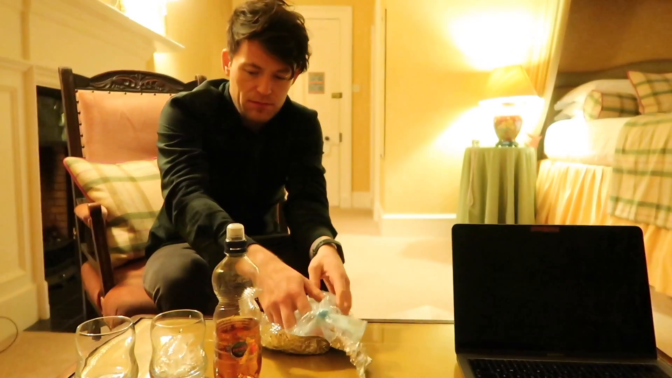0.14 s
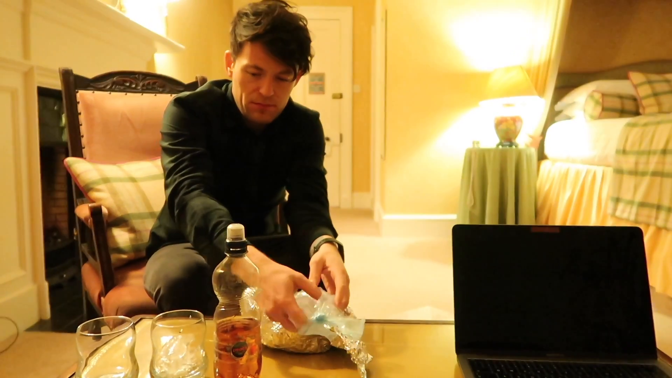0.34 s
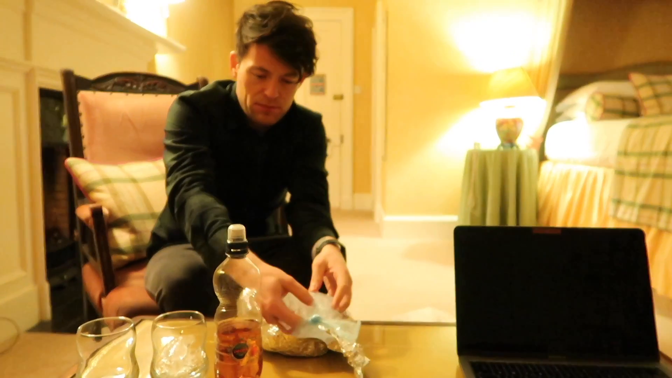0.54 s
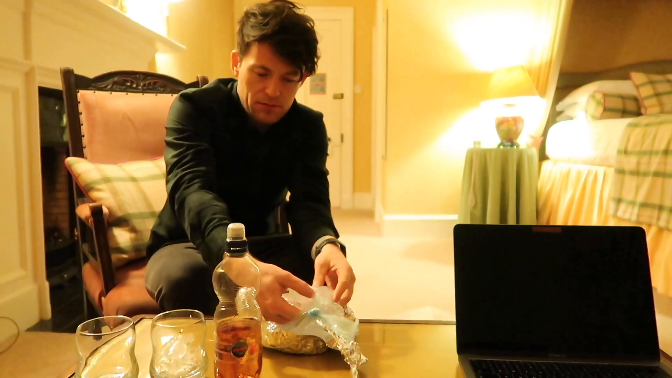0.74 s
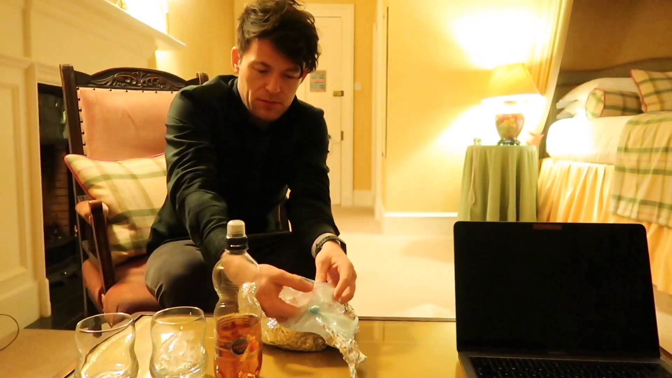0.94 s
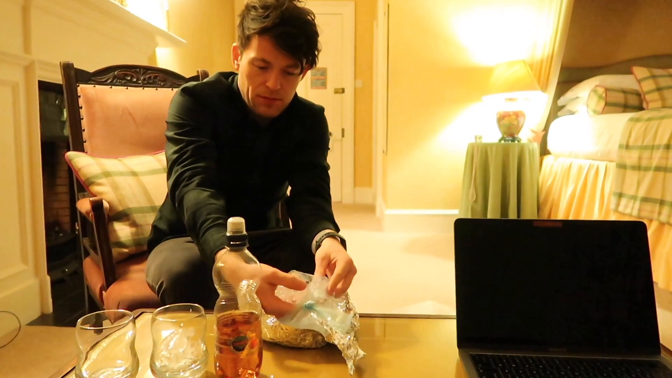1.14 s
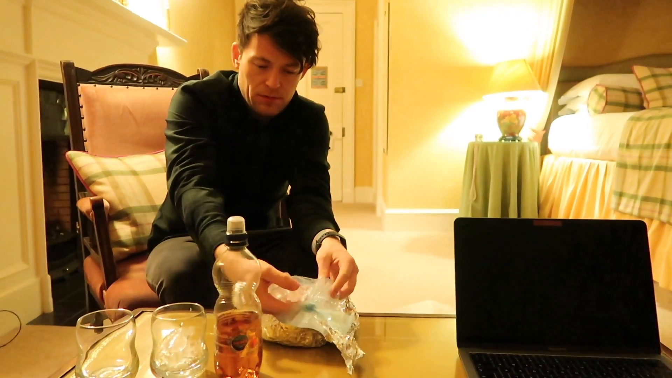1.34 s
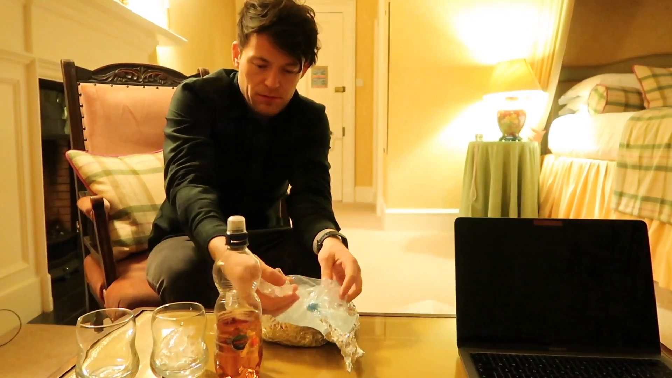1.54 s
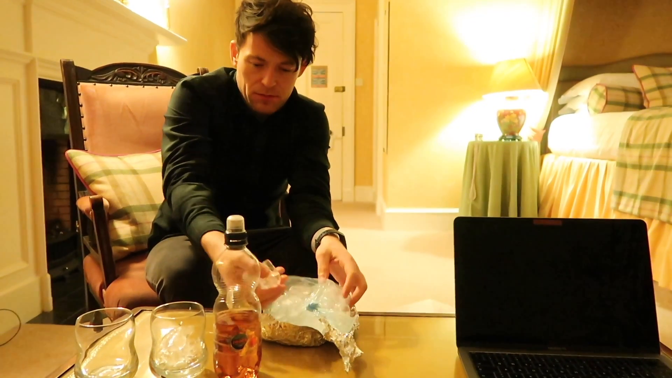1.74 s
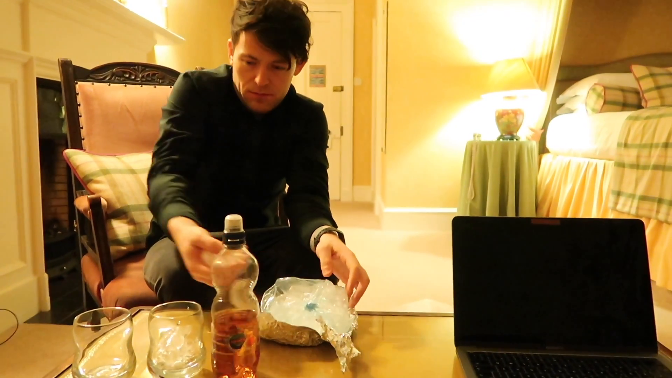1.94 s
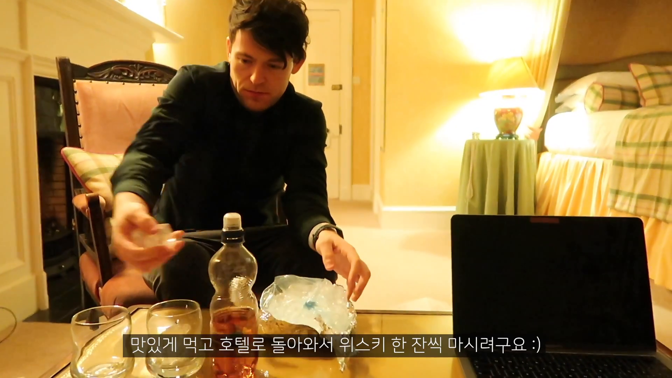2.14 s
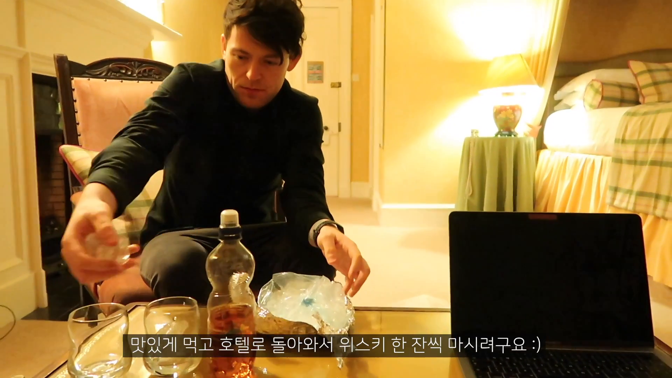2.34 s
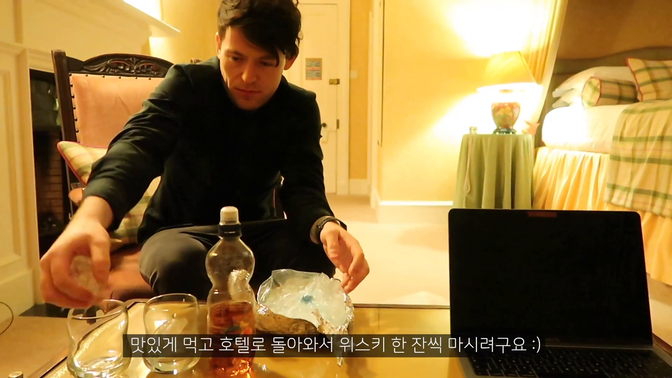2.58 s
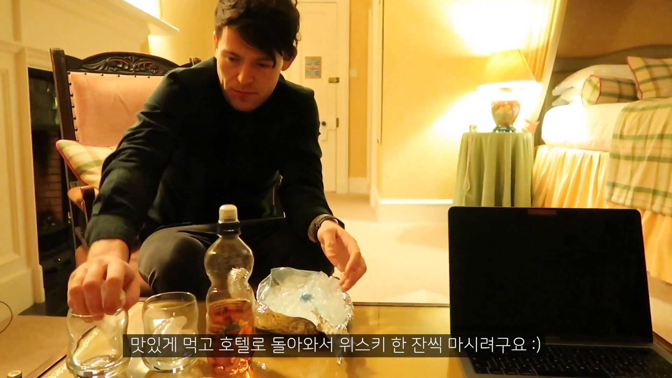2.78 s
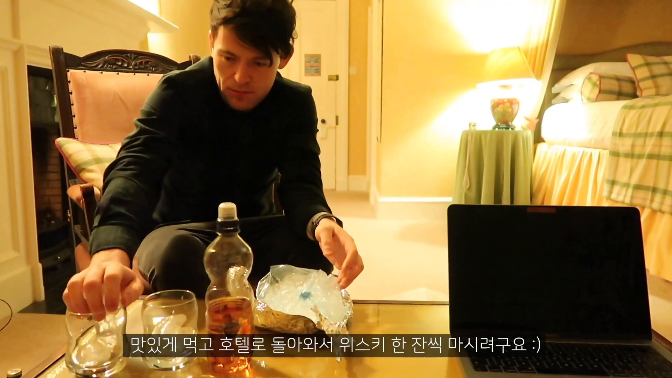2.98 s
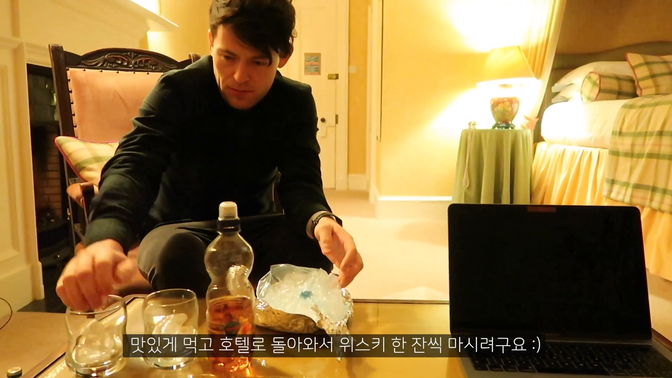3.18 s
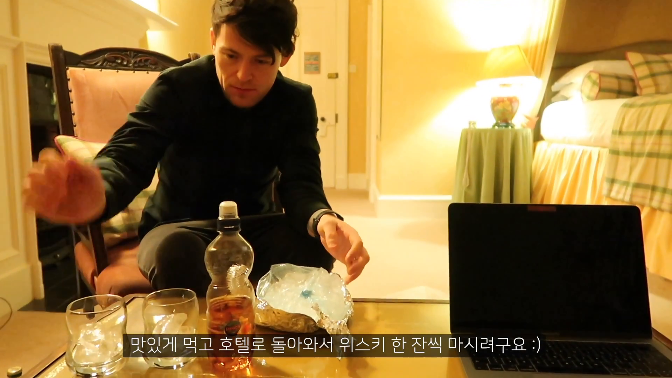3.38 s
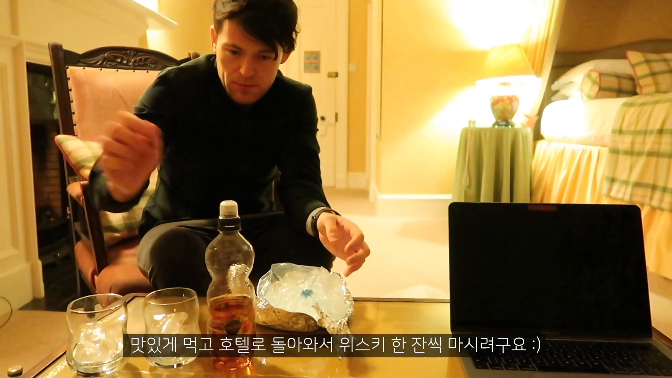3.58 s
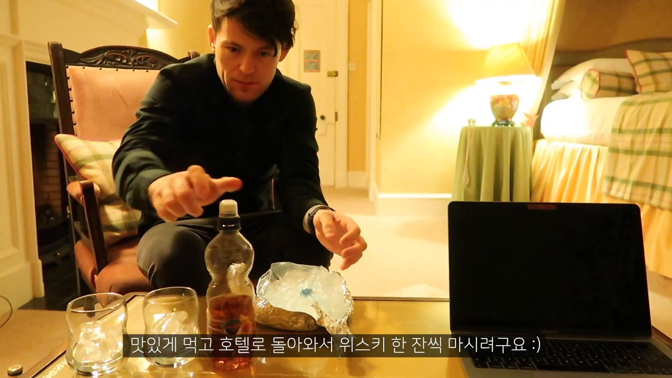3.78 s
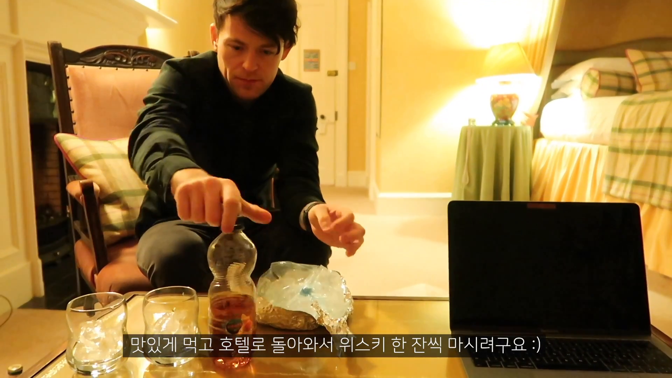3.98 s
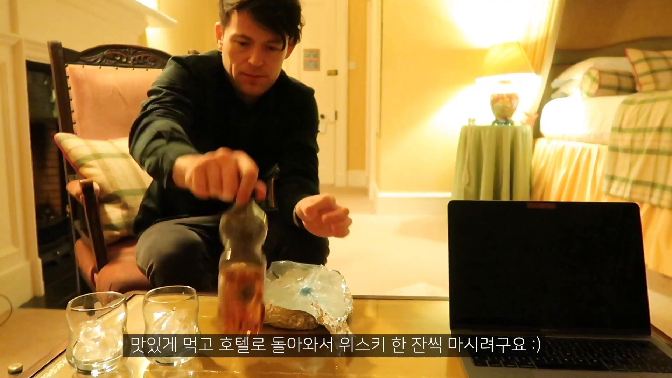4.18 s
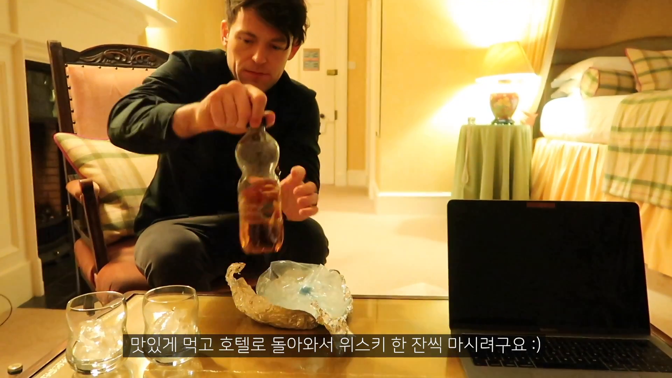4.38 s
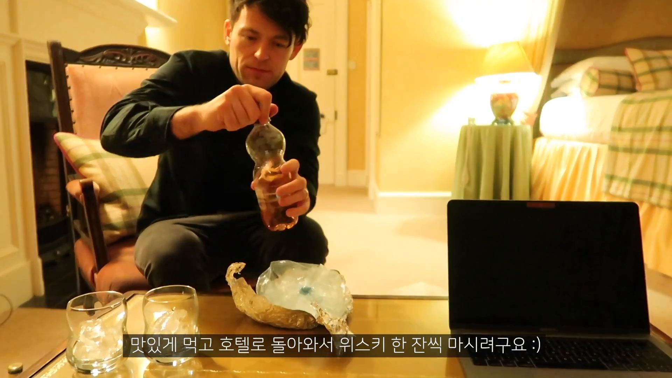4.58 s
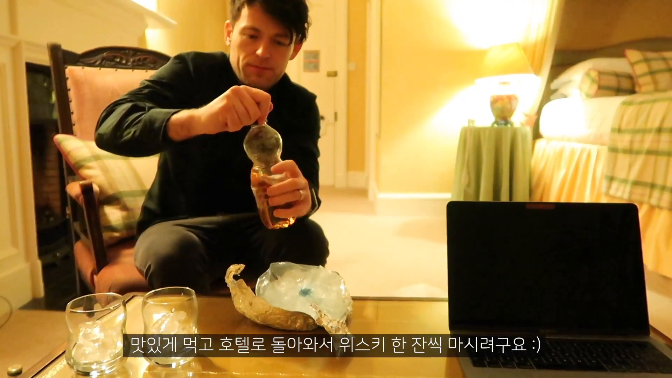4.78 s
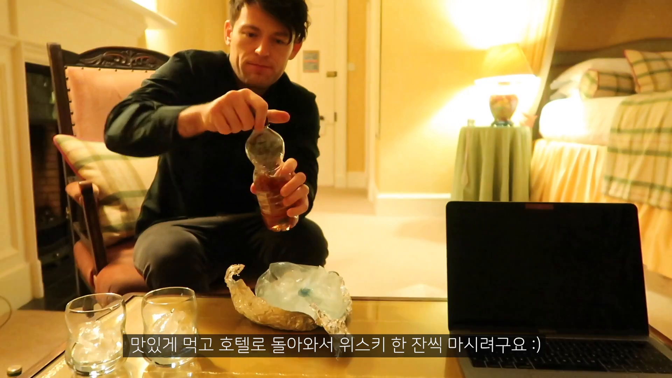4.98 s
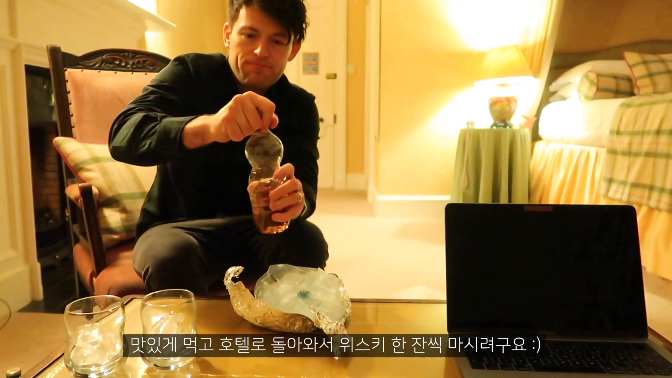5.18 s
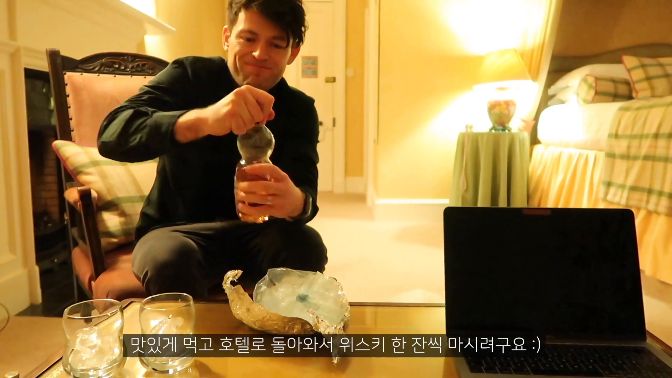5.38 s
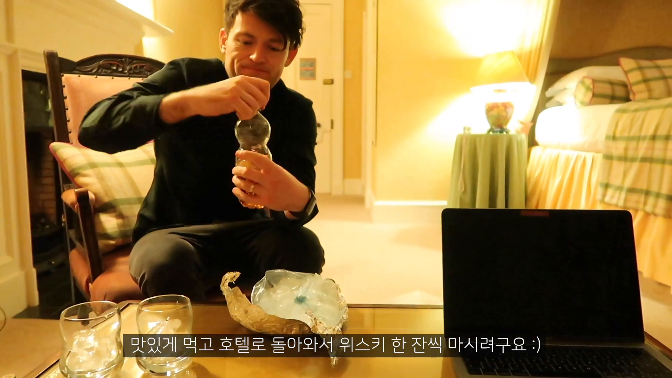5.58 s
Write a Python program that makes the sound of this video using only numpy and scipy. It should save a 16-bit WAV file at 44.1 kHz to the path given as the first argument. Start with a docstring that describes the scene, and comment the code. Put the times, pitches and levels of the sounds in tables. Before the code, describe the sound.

Ice rummaged in a crackling plastic bag, cubes tumbling ringing into a glass, then a plastic bottle gripped with pops and gulps.

```python
"""A hand rummages for ice in a plastic bag: cubes scrape, knock and sing while the film crackles.
The cubes then tumble into a glass tumbler on a tray, and each landing rings the wall.
After a lull with faint ticks, a part-filled plastic bottle is gripped: the palm thumps it, its wall pops
and the drink gulps. A quiet furnished room, heard from the table by a close pair of microphones;
noise excites modelled resonances, and decaying tones make the glass ring and the drink gulp."""
import sys
import numpy as np
from scipy import signal
from scipy.fft import rfft, irfft, next_fast_len
from scipy.io import wavfile
from scipy.ndimage import uniform_filter1d

SR = 44100
rng = np.random.default_rng(int(sys.argv[2]) if len(sys.argv) > 2 else 0)


def wav_record(signal):
    """Record a signal, one row per channel, as 16-bit PCM in the file named by sys.argv[1]."""
    frames = np.transpose(np.atleast_2d(signal))
    bounded = np.clip(frames, -1, 1)
    # unit amplitude maps onto the largest positive 16-bit level
    quanta = np.round(bounded * 32767).astype(np.int16)
    wavfile.write(sys.argv[1], SR, quanta)


N = 247842

# Spectrum of pieces sliding on glass and of fingers on plastic: pitch_hz, relative level_db [dB per Hz]
SLIDING = [(100, -9.5), (300, 3.5), (750, 0), (1400, -1), (2500, -1.5), (5000, -12), (8000, -22.5),
           (15000, -32)]


def amp(db):
    """Decibels to gain."""
    return 10 ** (np.asarray(db) / 20)


def unit(x):
    """Scales to rms 1."""
    return x / np.sqrt(np.mean(x ** 2) + 1e-20)


def read(points, hz):
    """Reads a table on a log-frequency axis."""
    f, value = np.transpose(points)
    return np.interp(np.log(hz + 1), np.log(f + 1), value)


def level(rows, order=1):
    """Gain over time from one dB column of a curve; -120 dB outside it."""
    rows = np.asarray(rows)
    return amp(np.interp(np.arange(N) / SR, rows[:, 0], rows[:, order], left=-120, right=-120))


def add(mix, s, sound):
    """Mixes a sound in at time s."""
    start = max(round(s * SR), 0)
    part = mix[start:][:len(sound)]
    part += sound[:len(part)]


def colour(x, points, size=2048):
    """Causal (minimum-phase) filter with the given spectrum."""
    log_gain = np.log(amp(read(points, abs(np.fft.fftfreq(size, 1 / SR)))))
    taps = np.fft.ifft(np.exp(np.conj(signal.hilbert(log_gain)))).real
    return signal.fftconvolve(x, taps)[:len(x)]


def body(x, modes):
    """Adds the ringing of an object's resonances to what strikes it."""
    ringing = 0
    for hz, width_hz, db in modes:
        b, a = signal.iirpeak(hz, hz / width_hz, fs=SR)
        ringing = ringing + amp(db) * signal.lfilter(b, a, x)
    return x + ringing


def resonate(x, hz, width_hz):
    """A resonance of gain 1 that follows a pitch curve, by shifting the pitch to zero and smoothing."""
    turn = np.exp(2j * np.pi * np.cumsum(hz * np.ones(len(x))) / SR)
    r = np.exp(-np.pi * width_hz / SR)
    return 2 * (turn * signal.lfilter([1 - r], [1, -r], x / turn)).real


def pair(z, alike):
    """Blends two unrelated signals into a left and right that are alike by frequency."""
    a, b = rfft(z)
    c = np.clip(read(alike, np.fft.rfftfreq(z.shape[1], 1 / SR)), -1, 1)
    mid = a * np.sqrt((1 + c) / 2)
    side = b * np.sqrt((1 - c) / 2)
    return irfft([mid + side, mid - side], z.shape[1])


def place(x, lead_us, shade_db):
    """Sets a source off-centre: a positive lead reaches the left first, and shade weakens treble on the right."""
    size = next_fast_len(N + 64)
    hz = np.fft.rfftfreq(size, 1 / SR)
    # share of shade_db at each pitch, strongest near 3400 Hz
    shade = read([(400, .1), (1300, .3), (2400, .5), (3400, 1), (4500, .7), (8000, .15)], hz)
    # half of the difference goes to each side
    half = amp(shade_db / 2 * shade) * np.exp(1j * np.pi * hz * lead_us / 1e6)
    return irfft(rfft(x, size) * np.array([half, 1 / half]), size)[:, :N]


def burst(s, length_s, db):
    """Gain over time of one movement: it swells, holds and fades."""
    out = np.zeros(N)
    add(out, s, amp(db) * signal.windows.tukey(round(length_s * SR), .6))
    return out


def stirred(rows, rise_s, fall_s, lag_s=0):
    """Gain over time of the friction around blows: it builds to each one by its strength and dies away."""
    t = np.arange(0, N, 32) / SR
    power = np.zeros(len(t))
    for s, db, *_ in rows:
        after = t - s - lag_s
        power += amp(db) ** 2 * np.exp(-2 * np.maximum(-after / rise_s, after / fall_s))
    return np.interp(np.arange(N) / SR, t, np.sqrt(power))


def clumps(per_s, fall_s, steady):
    """Gain over time of crumpling: folds give way at random, each in a short flurry over a steady rub."""
    starts = rng.uniform(0.59, 1, N) * (rng.random(N) < per_s / SR)
    flurries = signal.lfilter([1], [1, -np.exp(-2 / (fall_s * SR))], starts)
    return unit(np.sqrt(steady ** 2 + flurries))


def shifting(x, depth_db, hold_s, width_hz):
    """Contacts change as things move, so resonances come and go at random pitches."""
    z = signal.stft(x, nperseg=512)[2]
    bins, frames = round(width_hz * 512 / SR), round(hold_s * SR / 256)
    patches = uniform_filter1d(rng.standard_normal(z.shape), bins, 0)
    patches = uniform_filter1d(patches, frames, 1)
    return unit(signal.istft(z * amp(depth_db * unit(patches)), nperseg=512)[1][:N])


def grains(per_s, spread_db, spectrum):
    """Countless tiny slips and snaps, a few of them large."""
    sizes = amp(spread_db * np.minimum(rng.exponential(1, N), 4)) * rng.choice([-1, 1], N)
    happens = rng.random(N) < per_s / SR
    return unit(colour(sizes * happens, spectrum))


def clinks(per_s, width_hz, spectrum, count=36):
    """Many small cubes, each with its own dull pitch, tap one another at random."""
    pitches = np.linspace(500, 6000, count) * rng.uniform(.95, 1.05, count)
    taps = rng.standard_normal((count, N)) * (rng.random((count, N)) < per_s / count / SR)
    cubes = np.zeros(N)
    for hz, tap in zip(pitches, taps):
        b, a = signal.iirpeak(hz, hz / width_hz, fs=SR)
        cubes += signal.lfilter(b, a, tap)
    return unit(colour(cubes, spectrum))


def knock(spectrum, thin_db, width_hz, tilt_db, contact_s, pitch_hz, pitch_db, size=4096, count=7):
    """A brief chatter of contact rings the struck piece at its own pitch and at lesser, random ones."""
    pivot_hz = 1500  # the spectrum tilts about this pitch
    age = np.arange(size) / SR / max(contact_s, 1e-4)
    # the contact swells, dies, and leaves a weaker shudder behind it
    fade = (np.exp(-age) + .12 * np.exp(-age / 5)) * (1 - np.exp(-4 * age))
    # a flat spectrum with random phases keeps every blow at its own strength
    phases = np.angle(rfft(rng.standard_normal(size) * fade))
    chatter = irfft(np.exp(1j * phases)) * np.sqrt(fade)
    lesser_hz = 900 * 7 ** ((np.arange(count) + rng.random(count)) / count)
    chatter = body(chatter, [(hz, width_hz + hz / 40, -2) for hz in lesser_hz])
    chatter = chatter / np.linalg.norm(chatter)
    chatter = body(chatter, [(pitch_hz, width_hz + pitch_hz / 16, pitch_db)])
    hz = np.geomspace(50, 15000, 60)
    tilt = tilt_db * np.log2(np.clip(hz, 200, 9000) / pivot_hz)
    # just below its own pitch the piece thins by thin_db an octave, for an octave and a half
    thinning = thin_db * np.clip(np.log2(.85 * pitch_hz / hz), 0, 1.5)
    return colour(chatter, np.transpose([hz, read(spectrum, hz) + tilt - thinning]))


def knocks(rows, spectrum, thin_db, width_hz):
    """Plays a table of knocks; the wider their resonances, the duller they ring."""
    out = np.zeros(N)
    for s, db, tilt_db, contact_s, pitch_hz, pitch_db, *_ in rows:
        add(out, s, amp(db) * knock(spectrum, thin_db, width_hz, tilt_db, contact_s, pitch_hz, pitch_db))
    return out


def stillness():
    """Low rumble of the house under a faint hiss: shaped noise, most alike left and right in the bass."""
    # spectrum of the still room: pitch_hz, relative level_db
    quiet = [(12, -35.5), (20, -5.5), (103, -5.5), (126, -10.5), (180, -11), (219, -10), (324, -10.5),
             (352, -11), (452, -10), (491, -17), (881, -17), (2270, -22.5), (4430, -25.5), (13500, -41.5),
             (15500, -53)]
    # left-right likeness of the still room: pitch_hz, likeness [0-1]
    quiet_alike = [(60, 1), (130, 0.92), (290, 0.14), (640, 0.01), (2000, 0)]
    hz = np.fft.rfftfreq(N, 1 / SR)
    noise = irfft(rfft(rng.standard_normal((2, N))) * amp(read(quiet, hz)), N)
    return amp(-53) * unit(pair(noise, quiet_alike))


def room(x, first_s=.0052, early_db=6, early_s=0.0024):
    """Nearby surfaces answer after a few milliseconds, then a short soft tail follows."""
    # decay time of the echoes: pitch_hz, t60_s
    room_t60 = [(150, 0.19), (400, 0.3233), (1000, 0.3959), (3000, 0.2827), (8000, 0.3643), (15000, 0.006)]
    # strength of the echoes before the overall gain: pitch_hz, level_db
    room_db = [(150, -8), (350, -4), (800, -5), (3000, -4.5), (9000, -4)]
    # left-right likeness of the echoes: pitch_hz, likeness [0-1]
    echo_alike = [(150, 0.93), (1400, 1), (3100, 0.85), (6800, 0.024), (11000, 0.35)]
    noise = pair(rng.standard_normal((2, SR // 2)), echo_alike)
    hz, t, z = signal.stft(noise, SR, nperseg=256)
    t60 = read(room_t60, hz)[:, None]
    decay = np.exp(-np.log(1000) * t / t60)
    tail = signal.istft(z * amp(read(room_db, hz)[:, None]) * decay, SR, nperseg=256)[1]
    early = amp(early_db) * np.exp(-np.arange(tail.shape[1]) / SR / early_s)
    tail *= amp(-32) * (1 + early)
    tail = np.pad(tail, ((0, 0), (round(first_s * SR), 0)))
    return signal.fftconvolve(x, tail, axes=1)[:, :N]


def moving_room(x, count=3):
    """As the sources move, the pattern of echoes keeps changing: the sound fades among several tails."""
    turns_per_s = 4.3  # full rounds through the tails
    turn = np.arange(N) / SR * turns_per_s
    feeds = np.array([np.maximum(np.cos(2 * np.pi * (turn + k / count)), 0) for k in range(count)])
    return sum(room(x * feed) for feed in feeds / np.linalg.norm(feeds, axis=0))


def ticking():
    """A tiny mechanism near the microphones ticks in faint pairs of uneven strength during the lull."""
    from_s, to_s, every_s, pair_s = 3.53, 4.52, .04, .007
    tick_hz, tick_db = 4620, -56.5  # level before the random spread and the fade
    out, t = np.zeros(N), np.arange(SR // 100) / SR
    for s in np.arange(from_s, to_s, every_s):
        for at in (s, s + pair_s):
            tick = rng.standard_normal(len(t))
            for _ in range(2):
                tick = resonate(tick, tick_hz, width_hz=1100)
            add(out, at, amp(tick_db + rng.uniform(-9, 3)) * np.exp(-t / .002) * unit(tick))
    return out


def gulps():
    """The palm thumps the bottle and the jolted drink gulps: brief decaying tones."""
    # palm thumps on the bottle and gulps of the drink: start_s, pitch_hz, level_db, t60_s
    jolts = [(4.6962, 222, -21, 0.032), (4.698, 325, -24.5, .03), (4.789, 735, -26, 0.033),
             (5.2634, 450, -27, 0.023), (5.305, 844, -33, 0.044)]
    rise_s = 0.0013
    out, t = np.zeros(N), np.arange(SR // 4) / SR
    for s, hz, db, t60 in jolts:
        rise = 1 - np.exp(-t / rise_s)
        add(out, s, amp(db - 60 * t / t60) * rise * np.sin(2 * np.pi * hz * t))
    return out


def bottle():
    """The thin wall buckles under the fingers and rings over the drink inside."""
    # pops and knocks: start_s, relative strength_db, brightness [dB per octave], contact_s, pitch_hz, pitch_gain_db
    pops = [(4.678, -19, 4, 0.0046, 3500, 0), (4.6945, 0.5, -1, 0.0011, 1620, -1),
            (4.7, -6, -0.5, 0.0015, 300, 0), (4.7095, -10, 4, 0.004, 1500, 1.5),
            (4.725, -11, 0, 0.0057, 1550, 7), (4.738, -14, 2, 0.0054, 1750, 5.5),
            (4.7521, 6.5, 4.3, 0.0004, 2300, 2), (4.7545, -2, 4.5, .001, 2700, 4),
            (4.7572, -2.5, 2.5, .002, 2310, 1), (4.7658, -1, 1.5, 0.0007, 2300, 1),
            (4.7678, -2, 2, .001, 3800, 11), (4.7825, -7, 0, 0.0008, 2700, 5.5),
            (4.792, -9, 2, 0.0044, 4200, 4), (4.799, -8, -0.5, 0.0022, 3200, 9),
            (5.048, -22, -6.5, 0.0046, 420, 1.5), (5.064, -17, -2.5, 0.006, 750, 0),
            (5.1285, -18.5, 7, 0.00036, 2490, -6), (5.1965, -9, -4, 0.0017, 1000, -3),
            (5.2017, -4.5, -4.5, 0.002, 1480, -1), (5.2575, -1.5, -5.5, .0014, 732, 1),
            (5.2602, 3.5, -2, .0014, 1000, -1), (5.2655, -2, -4.5, .0014, 910, 0),
            (5.275, -3.5, -5, 0.00187, 1200, 5), (5.2945, -5, -5.5, .004, 1000, -2),
            (5.304, -10, -6, 0.0027, 2300, 8), (5.502, -15, -4.5, 0.0054, 400, -2),
            (5.509, -22.5, 4.5, 0.00095, 2500, -7.5)]
    # resonances of the bottle: pitch_hz, width_hz, gain_db
    wall = [(156, 34, 8), (302, 79, -7), (430, 65, -0.5), (728, 63, 7), (880, 120, -3), (1403, 75, 1.5),
            (2124, 630, -11.5), (4850, 1200, -0.5)]
    # spectrum of a knock on the bottle: pitch_hz, relative level_db
    wall_knock = [(50, -30), (140, -6.5), (280, -5.5), (450, -4.5), (800, -4.5), (1400, -3.5), (2000, -4.5),
                  (3000, -3.5), (7000, -14), (9500, -15), (12000, -18.5), (15000, -36)]
    # the fingers rub as the squeeze builds towards each pop and as it eases
    squeeze = stirred(pops, rise_s=0.0142, fall_s=0.024)
    rub = amp(-50.5) * squeeze * grains(per_s=800, spread_db=4.4, spectrum=SLIDING)
    blows = knocks(pops, wall_knock, thin_db=6.5, width_hz=164)
    sound = amp(-2) * body(blows + rub, wall) + gulps()
    return place(sound, lead_us=15, shade_db=3)


def rubs():
    """A cube dragged over its neighbours sings briefly: stick and slip drive one resonance of it."""
    # singing drags: start_s, length_s, pitch_hz, level_db before the swell and fade
    drags = [(0, 0.058, 1490, -51), (0.229, 0.17, 1500, -46), (0.272, 0.09, 1846, -41),
             (0.557, 0.091, 1553, -52), (.75, 0.12, 830, -48.5), (1.465, 0.1, 780, -45),
             (1.645, 0.041, 3320, -47.5), (1.679, 0.14, 877, -51), (1.888, 0.06, 1564, -48),
             (1.92, 0.1017, 2494, -47), (2.028, 0.09, 2390, -45.5)]
    out = np.zeros(N)
    for s, length_s, hz, db in drags:
        song = rng.standard_normal(SR // 2)[:round(length_s * SR)] ** 3  # cubed: sparse, spiky slips
        for _ in range(2):
            song = resonate(song, hz, width_hz=260)
        add(out, s, amp(db) * unit(song) * signal.windows.tukey(len(song), .6))
    return out


def bag():
    """One effort drives the scraping, most bumping and crackle; knocks, singing drags and single hand
    movements come at their own times."""
    # the hand digging in the bag: time_s, relative effort_db
    rummage = [(0, -42), (.2, -38), (.3, -32.5), (.37, -40.5), (.52, -48), (.61, -43.5), (.69, -45.5),
               (.83, -45), (1.05, -52.5), (1.19, -48.5), (1.28, -54), (1.46, -48), (1.53, -41.5),
               (1.61, -47), (1.66, -41.5), (1.7, -42), (1.8, -45.5), (2.06, -42.5), (2.14, -52.5),
               (2.29, -55.5), (2.46, -71)]
    # cubes knocking and folds snapping: start_s, relative strength_db, brightness [dB per octave],
    # contact_s, pitch_hz, pitch_gain_db
    ice_blows = [(.097, -6, 0, .003, 3780, 8), (0.104, -0.5, -1, 0.0065, 1148, 5),
                 (.13, -7, -2, 0.0034, 1250, 2), (0.151, -3.5, -1.5, 0.0026, 2210, 0),
                 (.244, -5, 0, 0.0027, 1800, 3), (0.252, 0, 0, 0.0071, 1870, 5),
                 (.268, -3.5, -0.5, 0.0053, 3600, 7), (0.2995, 2, -2, 0.0033, 1550, 5),
                 (.331, -6, -.5, 0.0022, 1850, 4), (.349, -6, -0.5, .004, 1400, 2),
                 (.383, -9.5, -0.5, .003, 1480, 8), (0.633, -18, -6.5, 0.0043, 150, 6.5),
                 (0.811, -9.5, -0.5, 0.00257, 1330, 5), (0.917, -11.5, 1.5, 0.0057, 2400, -5),
                 (0.936, -8, -1, 0.0035, 1500, -7), (1.215, -17, -0.5, 0.00203, 2400, 2),
                 (1.277, -23, 4, 0.00123, 5200, 7), (1.3135, -15.5, 0.5, 0.00187, 3610, 6.5),
                 (1.343, -18, 3, .0012, 5000, 7), (1.469, -8, -.5, 0.004, 790, 9),
                 (1.494, -10.5, 1.5, .006, 3400, 6), (1.534, -5, -1.5, 0.0037, 2300, 3),
                 (1.5405, 0.5, -5, 0.0035, 940, -2), (1.554, -7, -3, 0.0032, 2300, 10),
                 (1.6225, -1.5, 0.5, 0.0007, 1210, -1), (1.6275, -7.5, 0.5, .0015, 3400, 6),
                 (1.6365, -7, 1.5, 0.0012, 2370, 4), (1.694, -5.5, -2, .004, 1750, 2),
                 (1.7015, -5, 1, 0.0022, 4490, 7), (1.863, -15, 6, 0.0022, 4670, 5.5),
                 (1.8825, 2.5, -2, 0.0053, 1382, 2.5), (1.885, -6, 4.5, 0.0022, 4770, 5),
                 (1.899, -9, 1.5, .002, 5500, 7), (1.941, -8, -0.5, 0.0029, 2550, 3),
                 (1.968, -2.5, 2, 0.003, 2520, 3), (2.0423, -1.5, 1.5, .0025, 3410, 7.5),
                 (2.049, -4, -2.5, 0.00186, 895, 0), (2.056, -5.5, 0, 0.0029, 3650, 10),
                 (2.186, -14, 0.5, 0.0018, 1440, 10), (2.231, -24.5, 6, 0.00274, 5800, 6),
                 (2.367, -24.5, 4.5, 0.0016, 5000, 5), (2.5155, -16, -1, 0.00088, 2304, 9),
                 (2.807, -15, -5.5, 0.004, 352, 11), (2.808, -16, -2, .007, 2450, 11)]
    # spectrum of a knock in the bag: pitch_hz, relative level_db
    ice_knock = [(50, -17), (220, -1.5), (800, 0), (3000, -1.5), (9000, -16.5), (12000, -25), (15000, -39)]
    # spectra of scraping cubes, crackling film and dull bumps: pitch_hz, relative level_db [dB per Hz]
    scrape_spectrum = [(200, -35), (450, -6.5), (850, 1), (1600, 1), (2500, -1.5), (3800, -3.5),
                       (5500, -12.5), (9000, -31.5)]
    film_spectrum = [(1500, -20.5), (4500, 2), (7000, -3.5), (10000, -4.5), (13000, -6.5), (16000, -33.5)]
    bump_spectrum = [(50, -15.5), (100, -9.5), (148, 4), (200, -4), (380, -2.5), (700, -17), (2000, -50.5)]
    # the handful of cubes shifts above the glass: start_s, length_s, relative level_db
    handful = (2.805, 0.113, -52.5)
    # hand and sleeve brush dully against the bag and the table: start_s, length_s, relative level_db
    brushes = [(0.613, 0.18, -59), (1.498, 0.1, -53), (2.243, 0.233, -55), (2.666, 0.27, -58)]
    # the film clings to the hand as it pulls out: start_s, length_s, relative level_db
    pull_out = (1.93, 0.17, -47)

    effort = level(rummage)
    drive = effort / amp(-45)  # 1 at the reference effort

    crinkles = grains(per_s=1600, spread_db=4.2, spectrum=scrape_spectrum)
    jostle = crinkles + amp(-2) * clinks(per_s=2200, width_hz=90, spectrum=scrape_spectrum)
    jostle = shifting(jostle, depth_db=1.6, hold_s=.04, width_hz=260)
    jostle = jostle * clumps(per_s=70, fall_s=.008, steady=.55)
    scrape = (amp(-2.5) * effort + burst(*handful)) * jostle

    # crackle and most bumping follow the effort; the exponent is dB gained per dB of effort
    bumping = amp(-55) * drive ** 0.74 + sum(burst(*row) for row in brushes)
    bump = bumping * grains(per_s=440, spread_db=3, spectrum=bump_spectrum)
    # film on both sides of the hand
    film = 0
    for lead_us in (-15, 35):
        film = film + place(grains(per_s=900, spread_db=1.5, spectrum=film_spectrum), lead_us, shade_db=0)
    crackle = np.hypot(amp(-57.5) * drive ** 0.89, burst(*pull_out)) * film

    blows = amp(-1.5) * knocks(ice_blows, ice_knock, thin_db=2.5, width_hz=73)
    return place(scrape + bump + rubs() + blows, lead_us=11, shade_db=0.5) + crackle


def ring(contact, ring_db, overtones_db, shimmer_db, size=128, count=140):
    """The tumbler's modes ring; ice chattering against the wall (contact 0-1) damps them and shakes their pitch."""
    # modes of the tumbler: pitch_hz, relative level_db, t60_s when free of contact
    glass_modes = [(2649, -24.5, 0.18), (3440, -21, 0.126), (3435.4, -12.5, 0.2435), (3444, -.5, 0.09),
                   (3560, -17, 0.14), (3780, -24.5, .12), (4300, -18, 0.0604), (4544, -12, .05),
                   (4553, -7, 0.2), (4880, -7, .04), (6560, -19.5, 0.076), (6970, -20, 0.05),
                   (8890, 0.5, 0.045), (9900, -4.5, 0.06), (10540, -12.5, 0.08), (14440, -20.5, 0.096)]
    overtones_hz, shimmer_hz = 4000, 6000  # modes above these are overtones, then shimmer
    damp_db_per_s = 550  # extra decay at full contact
    shake_free, shake_touched = .002, .011  # shares of the pitch
    t = np.arange(size * count) / SR
    hz, db, t60 = np.transpose(glass_modes)[:, :, None]
    # where a cube lands sets each mode's share
    share_db = np.select([hz > shimmer_hz, hz > overtones_hz], [shimmer_db, overtones_db])
    strength_db = db + ring_db + share_db
    strength_db = strength_db + 2 * rng.standard_normal(hz.shape) * (hz > shimmer_hz)
    shake = np.repeat(rng.standard_normal((len(hz), count)), size, axis=1)
    pitch = hz * (1 + (shake_free + shake_touched * contact) * shake)
    onset = 1 - np.exp(-t / .0004)
    fall_db = (60 / t60 + damp_db_per_s * contact) * t
    modes = amp(strength_db - fall_db) * np.sin(2 * np.pi * np.cumsum(pitch, axis=1) / SR)
    return onset * modes.sum(0)


def tumbler():
    """Each cube knocks through glass and tray and rings the wall; after each blow the cubes slide and settle."""
    # cubes landing: start_s, relative knock_db, brightness [dB per octave], contact_s, pitch_hz, pitch_gain_db,
    # ring_db of the glass, then overtones_db and shimmer_db relative to the ring
    drops = [(2.9022, 5, .5, .0028, 4900, 16, -27, 5, 3.5), (2.9035, -9, 6, .002, 7020, 11, -35, -2, -6),
             (2.909, -1, -3.5, 0.0046, 423, 3, -27, -1, -14),
             (2.929, 6.5, -1, 0.0029, 1110, 4, -18, -8, -16.5),
             (2.936, -5, 0, 0.00194, 2600, -3, -20.5, -8.5, -16),
             (2.965, 7, -1.5, 0.0027, 685, 2.5, -37, -6, -10),
             (2.971, 5, -0.5, 0.0022, 2390, 3.5, -29.5, -12, -16.5),
             (2.979, -1.5, -2.5, 0.00346, 684, 2.5, -30, -16, -21.5),
             (2.987, -1.5, -2, 0.0022, 762, 4, -33, -16, -26.5),
             (2.996, -1, -2.5, 0.003, 2300, 2, -35, -5, -9),
             (3.0025, -5.5, -3.5, 0.0021, 647, 8, -34, -7, -14.5),
             (3.004, -10, 5.5, 0.00099, 7000, 11, -34, -2, 7),
             (3.019, -6, -4, .0018, 1500, 5, -41, -5, -15),
             (3.028, -4.5, -3.5, 0.0032, 450, 2, -46, 1, -15.5),
             (3.042, -1, -2, 0.0029, 690, 2, -39, -10.5, -11.5),
             (3.059, -6.5, 3.5, 0.0019, 4780, 13, -22, -7, -8),
             (3.064, -6.5, -1, .003, 2500, -0.5, -18, -27, -28),
             (3.074, -2.5, 4.5, .0015, 4100, 7.5, -27, -8, -9),
             (3.0865, 3.5, -1.5, 0.0022, 803, -0.5, -27.5, -9, -6),
             (3.096, 1, 2.5, 0.003, 2396, 4, -28, -9, -20),
             (3.105, -3, -1.5, .0016, 2500, 7, -29.5, -5.5, -18),
             (3.12, 7, 3, 0.0033, 825, 2, -27.5, -4, -24),
             (3.127, 0, 4.5, 0.00185, 4200, 8, -33.5, -0.5, -22),
             (3.135, 0, 4.5, 0.0029, 4300, 9, -42, 0, -21),
             (3.147, -6, -0.5, .002, 1900, 4, -41, -3, -20.5),
             (3.163, -8.5, -1.5, 0.0027, 820, 4, -47, -4.5, -17),
             (3.181, -2.5, -3, 0.0033, 858, 4, -51, -2, -10.5),
             (3.187, -9.5, 0, 0.0035, 817, 11, -29, 5.5, -14),
             (3.209, -6.5, -2, 0.0026, 800, 6, -33.5, -12, -23.5),
             (3.228, -3.5, -1, .005, 2600, 13, -29, -12, -9),
             (3.2405, 0.5, -2.5, 0.0014, 860, 2, -25, -6.5, -8),
             (3.247, -13.5, -3, 0.0031, 846, 2.5, -22.5, -16, -19),
             (3.257, -12, 2, 0.0029, 2600, 3.5, -20, -14, -24),
             (3.274, -9, -3, 0.0023, 905, 1, -26.5, -17, -20),
             (3.2937, 6.5, -1, 0.0028, 1144, 8.5, -20.5, -10.5, -2.5),
             (3.299, 3.5, 0, 0.0027, 1148, -2, -12.5, -20, -27),
             (3.316, -3.5, -1, 0.002, 1040, 6, -26, -3, -25), (3.331, -4, -1, .004, 2600, -1, -37, 7, -27),
             (3.366, -16, -2, 0.0031, 1040, 3, -33, -8.5, -22),
             (3.412, -13, -2, 0.00326, 1040, 12, -36, -19, -25),
             (3.487, -15, -3, 0.00194, 2500, 3, -51, -15.5, -25.5)]
    # how closely the tumbling ice crowds the wall: time_s, contact [0-1]
    crowding = [(2.9, .7), (2.94, 1), (3.08, 0.44), (3.19, 0.3), (3.25, 0), (3.3, .05)]
    # the hollow between tumbler and cupped hand rises in pitch as the cubes settle,
    # and opens as the hand lifts: time_s, pitch_hz, relative gain_db
    cupped = [(2.9, 680, 6), (2.97, 686.6, 7), (3.06, 690, 8.5), (3.09, 792, 15.5), (3.18, 820, 12),
              (3.24, 850, 15), (3.28, 870, 8), (3.301, 963, 6), (3.36, 1040, -9)]
    # resonances of the table and tray under the glass: pitch_hz, width_hz, gain_db
    tray = [(142.4, 8.7, 23), (413, 83, -4), (2450, 280, 0)]
    # spectrum of a knock in the tumbler: pitch_hz, relative level_db
    glass_knock = [(50, -24.5), (140, -4.5), (220, -6.5), (650, 2), (1600, -2), (3000, -3.5), (6500, -9),
                   (9000, -25), (12000, -23), (15000, -42.5)]

    rings = np.zeros(N)
    for s, *_, ring_db, overtones_db, shimmer_db in drops:
        contact = np.clip(np.interp(s, *np.transpose(crowding)), 0, 1)
        add(rings, s, ring(contact, ring_db, overtones_db, shimmer_db))

    jostle = grains(per_s=700, spread_db=3.2, spectrum=SLIDING)
    jostle = jostle + clinks(per_s=550, width_hz=40, spectrum=SLIDING)
    jostle = shifting(jostle, depth_db=3, hold_s=.02, width_hz=400)
    slide = amp(-45) * stirred(drops, rise_s=0.016, fall_s=0.06, lag_s=0.028) * jostle
    clatter = knocks(drops, glass_knock, thin_db=1.4, width_hz=80) + slide

    times, pitches, _ = np.transpose(cupped)
    hollow_hz = np.interp(np.arange(N) / SR, times, pitches)
    hollow = level(cupped, order=2) * resonate(clatter, hollow_hz, width_hz=71)
    sound = amp(-2.5) * (body(clatter, tray) + amp(-3) * hollow) + rings
    return place(sound, lead_us=44, shade_db=3.8)


def scene():
    """Bag, tumbler and bottle with their echoes, over the still room and the ticks."""
    direct = bag() + tumbler() + bottle()
    return direct + moving_room(direct) + stillness() + ticking()


def record(dry):
    """The band limit of the microphone chain: a steep low-pass at 15.5 kHz."""
    taps = signal.firwin(255, 15500, window=("kaiser", 9), fs=SR)
    return signal.oaconvolve(dry, taps[None], "same")


dry = scene()
out = record(dry)
wav_record(out)
```